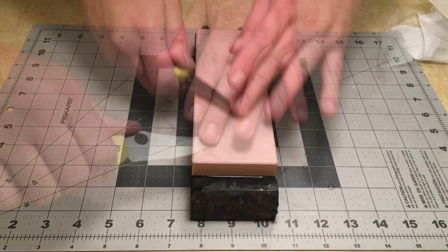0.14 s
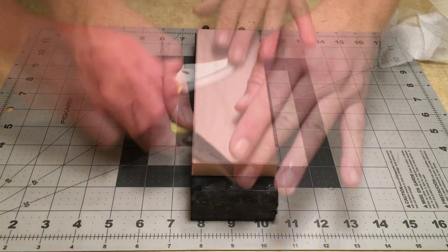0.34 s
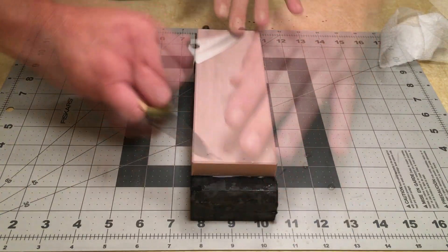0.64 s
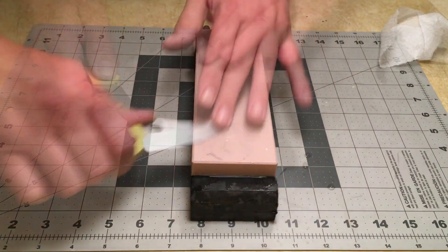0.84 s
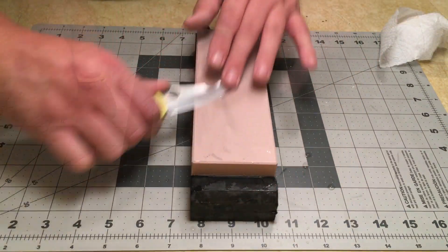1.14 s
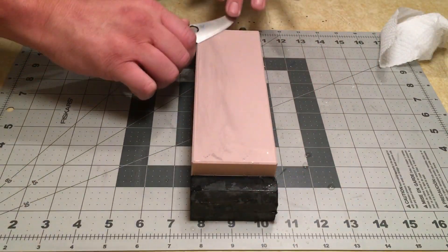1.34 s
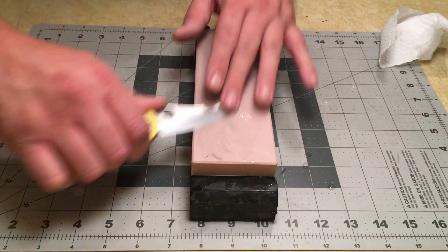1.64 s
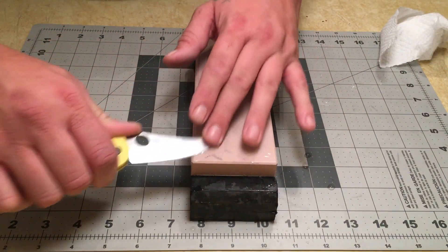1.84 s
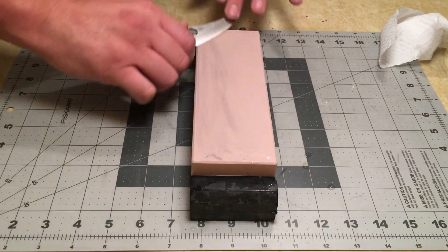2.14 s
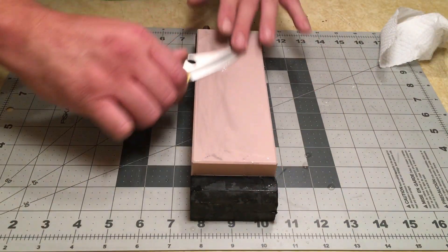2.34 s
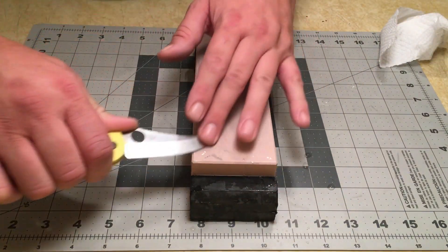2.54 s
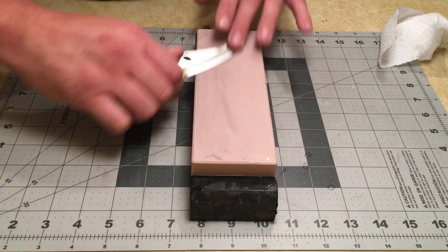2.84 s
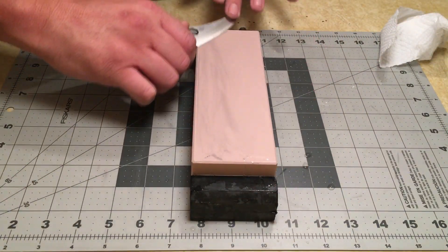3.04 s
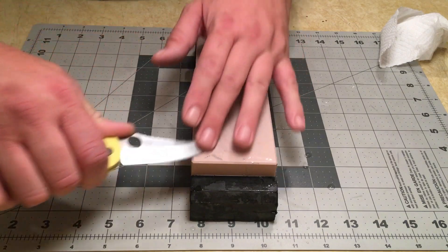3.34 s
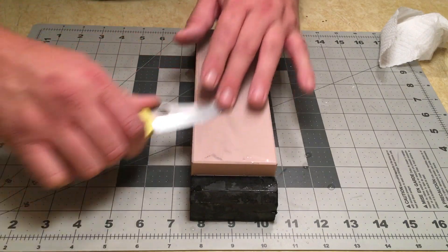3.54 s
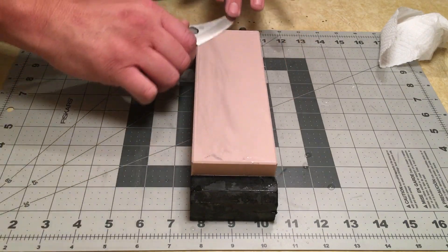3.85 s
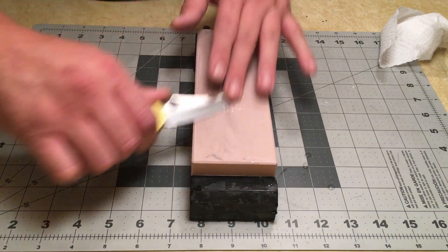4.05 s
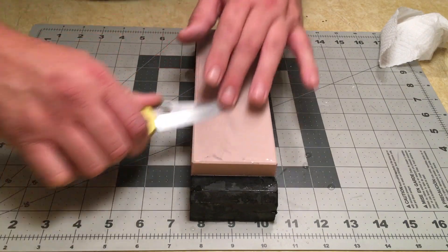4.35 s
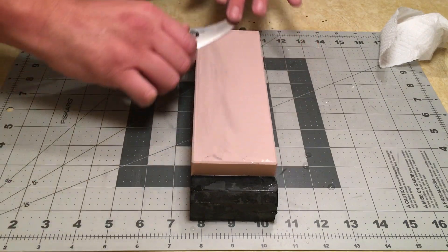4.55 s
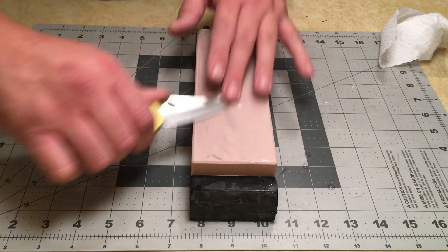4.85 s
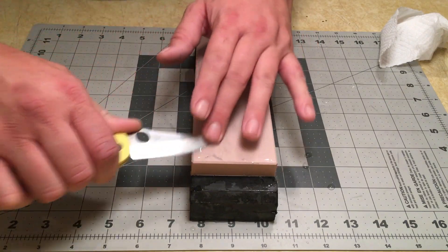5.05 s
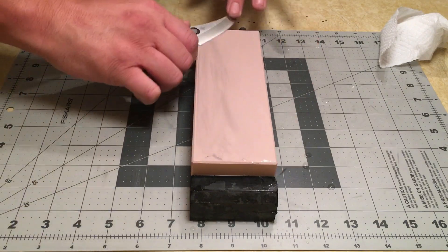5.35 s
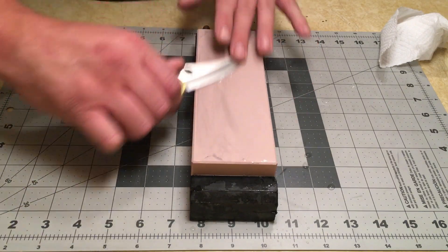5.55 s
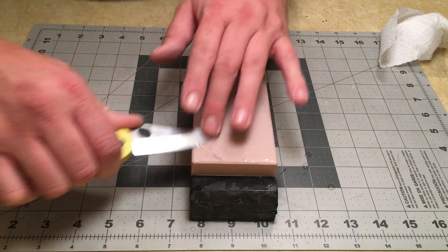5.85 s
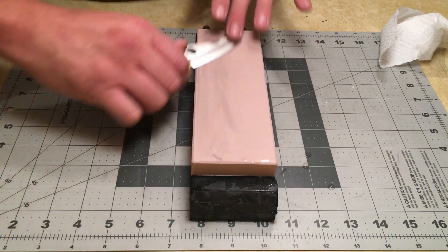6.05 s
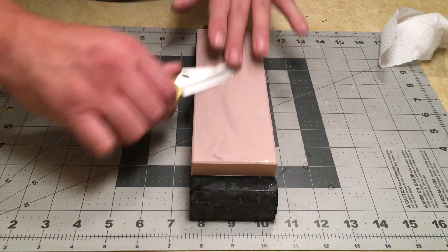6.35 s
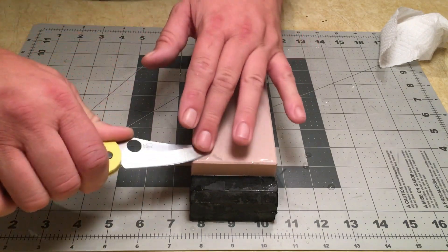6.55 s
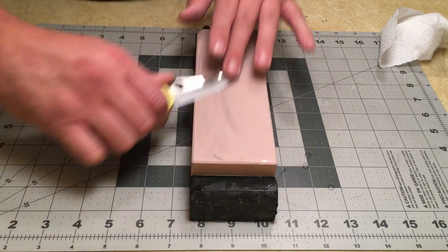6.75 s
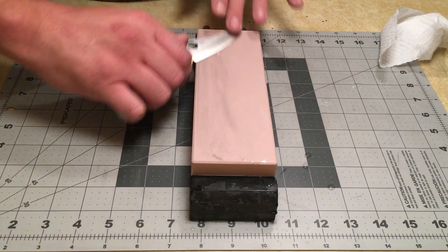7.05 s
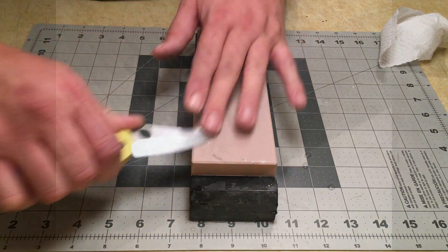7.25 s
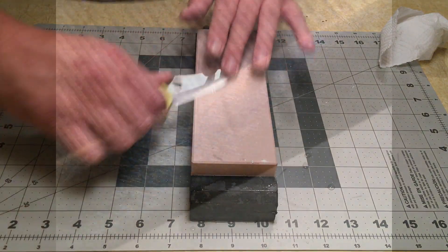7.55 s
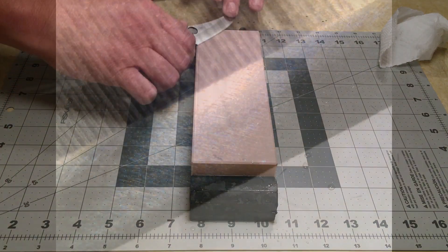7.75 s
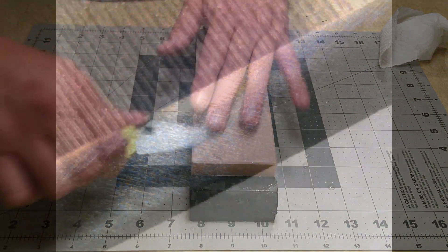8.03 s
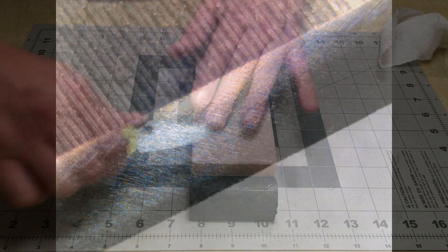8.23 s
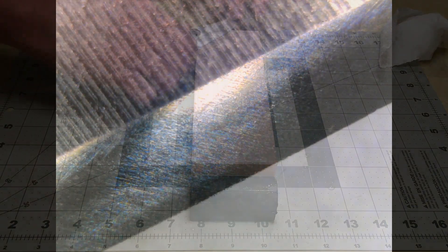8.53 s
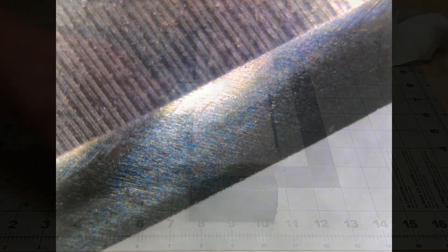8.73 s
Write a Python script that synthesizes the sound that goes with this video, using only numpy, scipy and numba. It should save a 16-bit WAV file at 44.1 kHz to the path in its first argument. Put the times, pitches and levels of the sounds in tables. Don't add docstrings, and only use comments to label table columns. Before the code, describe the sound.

A small knife blade strokes lightly back and forth on a fine wet stone, thin bright scrapes over a steady low motor hum.

```python
import sys
import numpy as np
from scipy import signal
from scipy.fft import rfft, irfft, next_fast_len
from scipy.io import wavfile
from scipy.ndimage import uniform_filter1d
from numba import njit

SR = 44100
rng = np.random.default_rng(int(sys.argv[2]) if len(sys.argv) > 2 else 0)


def store_pcm(level_fs):
    pcm = np.round(np.clip(level_fs, -1, 1) * 32767).astype(np.int16)
    wavfile.write(sys.argv[1], SR, np.atleast_2d(pcm).T)


def level_to_linear(level):
    exponent = np.asarray(level, float) / 20
    return 10 ** exponent


N = 392049
CHANGE_S, END_S = .445, 8.0785


def unit(x):
    return x / np.sqrt(np.mean(x ** 2))


def noise():
    return rng.standard_normal(N)


def resonate(x, modes, order=1):
    size = next_fast_len(N)
    f = np.arange(size // 2 + 1) * SR / size + .01
    gain = sum(level_to_linear(db) / (1 + 1j * (f - hz ** 2 / f) / width) ** order for hz, width, db in modes)
    return unit(irfft(rfft(x, size) * gain, size)[:N])


@njit
def glide(x, hz, sharp):
    y, band, low = np.empty(len(x)), 0., 0.
    for i in range(len(x)):
        g = np.tan(np.pi * hz[i] / SR)
        v = (band + g * (x[i] - low)) / (1 + g * (g + 1 / sharp))
        band, low, y[i] = 2 * v - band, low + 2 * g * v, v / sharp
    return y


def walk(rate):
    k = int(SR / rate)
    held = np.repeat(rng.standard_normal(N // k + 1), k)
    return 1.3 * uniform_filter1d(uniform_filter1d(held, k), k)[:N]


# f/Hz, width/Hz, level/dB
EDGE_MODES = [(11150, 2600, 0), (12240, 1900, -1), (13500, 2400, -0.5), (15100, 3000, -3)]
BELLY_MODES = [(7920, 1400, -2), (8500, 900, -1), (9170, 750, -0.5), (9940, 1000, -0.5)]
SPINE_MODES = [(3900, 800, 6.5), (4700, 150, -3), (5230, 67, -3.5), (5690, 100, -5), (6260, 170, 0),
               (6800, 560, -5.5), (6000, 27000, -0.5)]
RING_MODES = [(2290, 130, 0), (2180, 160, -2), (1980, 140, -8), (2700, 400, -11), (1450, 900, -9)]
# f/Hz, width/Hz, level/dB
SINGING_MODES = [(4684, 70, -4), (5180, 70, 2), (5600, 60, 0), (5776, 40, 3), (6270, 70, -4),
                 (8250, 90, -5), (8790, 60, 0), (9160, 70, -4), (11600, 90, -4), (11910, 90, -2),
                 (12600, 120, -6), (13200, 120, -5)]
# t/s, level/dB
HEEL_TOUCH = [
    (.43, -88),
    (.455, -56.5),
    (.52, -61),
    (.62, -68.5),
    (.7, -86),
]


def knife(t):
    edge, belly, front, ring = pressure(t)
    centre_hz = np.clip(front_hz(t) * (1 + 0.065 * walk(70)), 1000, 15000)
    loose = grit(1.5)
    climb = unit(glide(glide(loose, centre_hz, 3.), centre_hz, 3.))
    climb = climb + .6 * resonate(loose, [(5000, 5500, 0)], order=2)
    resting = resonate(grit(1.4), [(5350, 1500, 0)], order=2)
    climb = level_to_linear(1.2 * walk(70)) * climb + .5 * level_to_linear(2.2 * walk(50)) * resting

    steel = edge * patchy(t, EDGE_MODES + [(14200, 2600, -5)], 2.6, 55, 1.1, .025, .009)
    steel = steel + belly * patchy(t, BELLY_MODES, 3.3, 55, 1.3, .011, 0.018)
    steel = steel + front * resonate(climb, SPINE_MODES)
    steel = steel + .3 * np.std(steel) * resonate(steel, SINGING_MODES)
    chatter = level_to_linear(1.0 * walk(60))

    heel_level = level_to_linear(np.interp(t, *np.transpose(HEEL_TOUCH), left=-150, right=-150))
    heel = heel_level * resonate(grit(0.89), [(1650, 250, 0)], order=2)
    low_ring = ring * patchy(t, RING_MODES, 2.5, 90, 1.5, .022, .1)
    return heel + chatter * steel + low_ring


def grit(coarse_db):
    return noise() * level_to_linear(coarse_db * rng.exponential(size=N))


TURNS = [.06, .62, 1.04, 1.455, 1.875, 2.28, 2.67, 3.08, 3.49, 3.89, 4.29, 4.69, 5.08, 5.46, 5.85, 6.25,
         6.64, 7.025, 7.43, 7.83]


def patchy(t, modes, patch_db, rate, coarse_db, drift, halt_s):
    out, from_turn = 0, np.min([np.abs(t - turn) for turn in TURNS], axis=0)
    for hz, width, db in modes:
        moving_db = -10 * np.exp(-(from_turn / (halt_s * (hz / 10000) ** 2)) ** 2)
        centre_hz = np.minimum(hz * (1 + drift * walk(rate / 2)), .4 * SR)
        once = glide(grit(coarse_db), centre_hz, hz / width)
        mode = unit(glide(once, centre_hz, hz / width))
        out = out + level_to_linear(db + moving_db + patch_db * walk(rate)) * mode
    return unit(out)


def swells(t, start, length, peak_db, rise_db_s, fall_db_s):
    grid = t[::64, None]
    early = np.clip(start - grid, 0, None)
    late = np.clip(grid - start - length, 0, None)
    db = peak_db - rise_db_s * early - fall_db_s * late
    return np.interp(t, grid[:, 0], np.sum(level_to_linear(db) ** 2, axis=1))


# t/s, length/s, front level/dB, treble level/dB, ring level/dB
PUSHES = [
    (.80, 0.073, -60.5, -62, -60),
    (1.63, 0.062, -55, -58, -55),
    (2.41, 0.084, -62, -66, -62),
    (3.22, 0.088, -56.5, -59.5, -57),
    (4.05, 0.068, -60.5, -63, -57),
    (4.84, 0.048, -59, -61.5, -59.5),
    (5.60, .05, -60.5, -64.5, -57.5),
    (6.38, 0.11, -59.5, -64.5, -58),
    (7.175, .11, -52, -54, -55),
    (7.93, 0.14, -60.5, -65, -56.5),
]
# t/s, front level/dB, ring level/dB
PULLS = [
    (1.20, -66, -63),
    (1.98, -70.5, -59),
    (2.81, -72, -62.5),
    (3.65, -69.5, -66),
    (4.43, -69.5, -60.5),
    (5.22, -72, -65),
    (5.985, -70.5, -56.5),
    (6.79, -72, -61),
    (7.58, -66.5, -65),
]
BITES_DB = [-58.5, -58.5, -65.5, -58.5, -69, -57, -67.5, -58.5, -65.5, -61.5, -65, -60, -61, -59, -63.5,
            -59.5, -63, -63.5, -63.5, -60.5]
# t/s, length/s, edge level/dB, belly level/dB
CATCHES = [(0.209, .14, -57, -57.5), (0.445, .11, -60.5, -63), (0.947, .04, -67.5, -71.5),
           (1.364, .05, -61, -62), (2.11, .01, -61.5, -61.5), (2.20, .02, -61.5, -62),
           (2.94, .04, -60.5, -64), (3.016, .01, -64, -61.5), (3.33, .02, -58.5, -58),
           (3.73, .04, -58, -59), (3.84, .02, -67, -64), (4.52, .02, -60.5, -62), (4.623, .02, -60, -61),
           (5.03, .02, -60, -63), (5.41, .02, -66, -61.5), (5.711, .02, -63, -66),
           (6.09, .03, -60.5, -60.5), (6.20, .02, -62, -61), (6.58, .03, -62.5, -70.5),
           (6.794, .03, -67, -64.5), (6.967, .02, -63.5, -59.5), (7.57, .04, -62.5, -64),
           (7.74, .04, -67.5, -69)]


def pressure(t):
    push, length, front_db, treble_db, ring_db = np.transpose(PUSHES)
    pull, pull_front_db, pull_ring_db = np.transpose(PULLS)
    catch, catch_s, edge_db, belly_db = np.transpose(CATCHES)
    belly_lag_s, ring_lag_share = .03, .65
    bite_lag_s, bite_s, pull_front_lag_s, pull_front_s, pull_ring_s = .081, .0072, .015, .04, .025

    grab = lambda *event: swells(t, *event, 194, 213.5)
    sweep = lambda *event: swells(t, *event, 202, 190)
    bites = grab(np.array(TURNS) + bite_lag_s, bite_s, np.array(BITES_DB))
    coarse = grab(catch, catch_s, belly_db)

    edge = sweep(push, length, treble_db) + bites + grab(catch, catch_s, edge_db)
    belly = sweep(push + belly_lag_s, length - belly_lag_s, treble_db) + level_to_linear(2 * -5) * bites + coarse
    front = swells(t, push, length, front_db, 200.5, 190)
    front = front + sweep(pull + pull_front_lag_s, pull_front_s, pull_front_db) + level_to_linear(2 * -10) * coarse
    ring = swells(t, push + ring_lag_share * length, (1 - ring_lag_share) * length, ring_db, 190, 190)
    ring = ring + swells(t, pull, pull_ring_s, pull_ring_db, 502, 190)
    beds = level_to_linear([-70, -70, -81, -80])
    return [np.sqrt(power + bed ** 2) for power, bed in zip((edge, belly, front, ring), beds)]


# t/s from the sweep, f/Hz
CLIMB = [(-.19, 3900), (-.05, 4700), (.015, 5760), (.07, 8460)]
# t/s from the sweep, f/Hz
SINK = [(0., 5410), (.06, 4700), (.15, 3850)]


def front_hz(t):
    path = [(CHANGE_S, 4700)]
    for strokes, law in ((PUSHES, CLIMB), (PULLS, SINK)):
        path += [(stroke[0] + s, hz) for stroke in strokes for s, hz in law]
    return np.interp(t, *np.transpose(sorted(path)))


KNOCK_S = [.318, 1.712, 5.413, 5.716, 6.209]
# thud level/dB, smack level/dB, thud f/Hz
KNOCKS = [
    (-69, -54, 470),
    (-75, -55.5, 600),
    (-36, -51.5, 410),
    (-69, -53, 720),
    (-36.5, -59, 460),
]


def knocks(t):
    out, hiss = np.zeros(N), resonate(noise(), [(10000, 7000, 0)])
    for s, (thud_db, smack_db, hz) in zip(KNOCK_S, KNOCKS):
        age = np.clip(t - s, 0, None)
        swell = lambda rise_s: np.e * age / rise_s * np.exp(-age / rise_s)
        out += level_to_linear(thud_db) * np.sin(2 * np.pi * hz * age * (1 + 40 * age)) * swell(.001)
        out += level_to_linear(thud_db - 8) * np.sin(4 * np.pi * hz * age) * swell(.0005)
        out += level_to_linear(smack_db) * hiss * swell(.004)
    return out


# multiple of shaft f, level/dB
BIG_ORDERS = [(1, -46), (3, -72), (7, -60), (8, -79), (10, -80), (11, -79), (12, -79), (13, -71), (14, -81),
              (15, -85), (19, -78), (21, -84), (45, -94), (47, -88), (48, -90), (50, -90), (51, -93),
              (52, -79)]
# multiple of buzz f, multiple of shaft f, level/dB
SMALL_ORDERS = [(0, 1, -59), (0, 2, -73), (0, 3, -71), (0, 4, -64), (0, 5, -73), (0, 8, -66), (1, 1, -65),
                (2, 0, -73), (2, 1, -70), (1, 4, -72), (1, 5, -67), (3, 2, -72), (1, 7, -77), (4, 3, -78),
                (3, 7, -77), (5, 3, -81), (3, 8, -79), (5, 8, -80), (7, 4, -81), (6, 8, -81)]


def motors(t):
    t = t - .0062 * (t > CHANGE_S)
    big_hz, small_hz, buzz_hz = 58.905, 49.23, 120
    big = big_hz * t + .012 * walk(.4)
    small = small_hz * t + .02 * walk(.5)
    orders = [(k * big, db) for k, db in BIG_ORDERS]
    orders += [(m * buzz_hz * t + k * small, db) for m, k, db in SMALL_ORDERS]
    out = np.zeros(N)
    for turns, db in orders:
        level = np.sqrt(2) * level_to_linear(db + .5 * walk(1.5))
        out += level * np.sin(2 * np.pi * (turns + rng.random()))
    return out


def fan(t):
    hz = 109.8
    tone = np.sqrt(2) * np.sin(2 * np.pi * (hz * t + 0.02 * walk(1.)))
    draught = resonate(noise(), [(hz, 11, 0)], order=2)
    return level_to_linear(-56.5) * tone + level_to_linear(-59) * draught


# f/Hz, level/dB per Hz
AIR_SPECTRUM = [(15, -38.5), (25, -20), (70, -7), (240, -13), (411, -15.5), (510, -20), (897, -26),
                (1110, -22.5), (2120, -29.5), (2630, -34.5), (5030, -38), (9340, -40), (15600, -50)]
# f/Hz, width/Hz, level/dB rms
HUMPS = [(124.7, 14, -60), (62, 42, -67), (181, 21, -64), (281.7, 22, -64), (344.4, 40, -60),
         (651, 150, -68), (756.5, 100, -71.5), (1154, 720, -64.5), (2100, 21, -74.5), (1347, 81, -80.5),
         (2470, 54, -85), (3250, 60, -80.5), (3080, 480, -81), (6474, 500, -72.5), (32.7, 0.69, -76.5)]


def air():
    size = next_fast_len(N)
    hz, db = np.transpose(AIR_SPECTRUM)
    f = np.arange(size // 2 + 1) * SR / size
    colour = level_to_linear(np.interp(np.log(f + 1), np.log(hz), db))
    broad = unit(irfft(rfft(rng.standard_normal(size)) * colour, size)[:N])
    humps = sum(level_to_linear(db) * resonate(noise(), [(hz, width, 0)], order=2) for hz, width, db in HUMPS)
    return level_to_linear(-53) * broad + humps


def early_rumble(t):
    return level_to_linear(-55.5) * resonate(noise(), [(150.3, 71, 0)], order=2) * (t < CHANGE_S)


def port(x):
    notch_hz, width_hz, depth = 10310, 900, .5
    return x - depth * glide(x, np.full(N, 1. * notch_hz), notch_hz / width_hz)


def scene():
    t = np.arange(N) / SR
    mono = port(knife(t) + knocks(t) + motors(t) + fan(t) + air() + early_rumble(t))
    return np.array([mono, mono]) * (t < END_S)


def band_limit(x):
    return signal.sosfilt(signal.butter(12, 15720, fs=SR, output="sos"), x)


SPREAD_S = [.36, .425, .48, 2.52, 2.755, 4.38, 4.43, 4.475, 5.335, 5.59, 5.825, 6.87]


def record(dry):
    mono, side = dry[0], np.zeros(N)
    hop, offset = 1024, 405
    window = signal.windows.kaiser_bessel_derived(2 * hop, 4 * np.pi) ** 2
    lows = rng.uniform(4500, 13000, 2 * len(SPREAD_S))
    for s, low in zip(SPREAD_S * 2, lows):
        high = low * 2 ** .25
        middle = offset + hop * round((s * SR - offset) / hop)
        span = slice(middle - hop, middle + hop)
        bandpass = signal.butter(6, [low, high], "bandpass", fs=SR, output="sos")
        side[span] += .9 * window * signal.sosfiltfilt(bandpass, mono[span][::-1])
    return band_limit(dry + np.array([side, -side]))


dry = scene()
out = record(dry)
store_pcm(out)
```